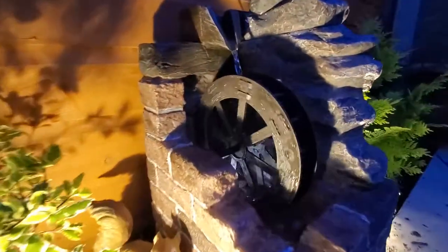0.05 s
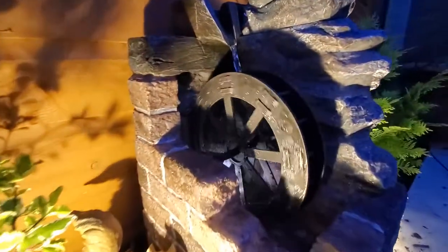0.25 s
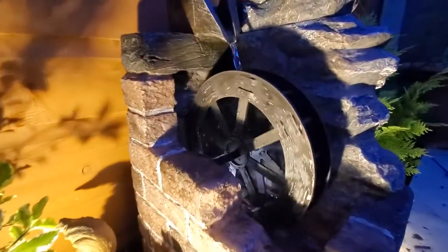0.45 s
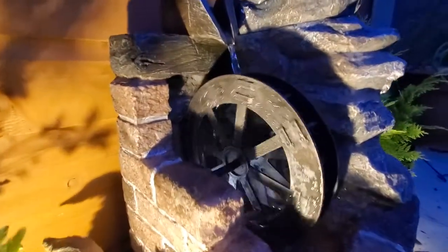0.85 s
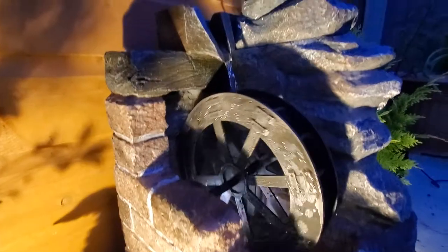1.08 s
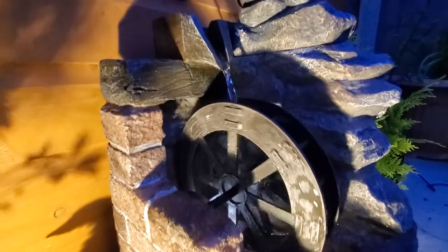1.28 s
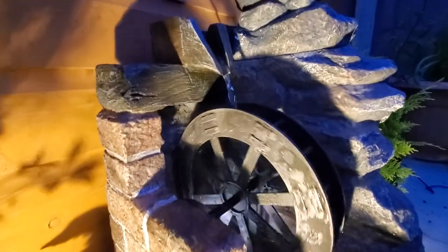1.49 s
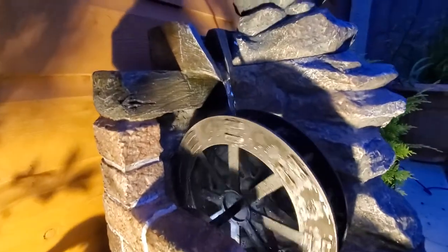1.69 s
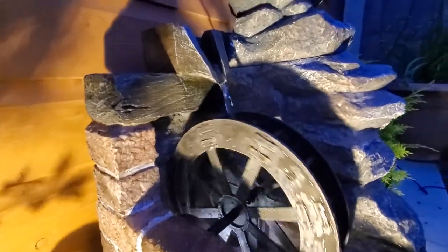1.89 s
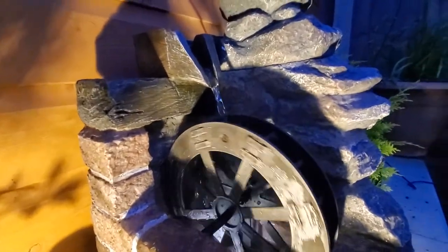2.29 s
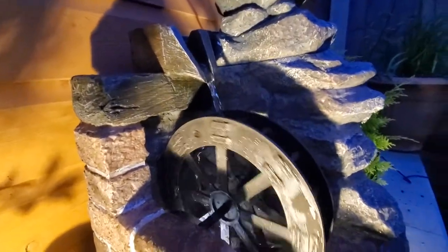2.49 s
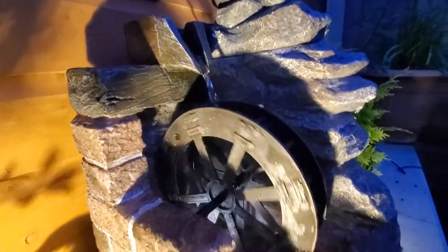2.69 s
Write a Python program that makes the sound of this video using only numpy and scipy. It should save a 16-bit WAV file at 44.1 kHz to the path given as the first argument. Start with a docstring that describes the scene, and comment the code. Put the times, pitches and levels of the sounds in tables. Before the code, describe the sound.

Water drips and splashes steadily in a small stone fountain nearby. Round plops, quick slaps on the wheel and tiny bubble pings mingle throughout, above a faint pump hum and a soft outdoor rumble.

```python
"""Water plops, patters and fizzes as a thin stream falls on the wheel of a small garden fountain.
Big drops trap air in the basin, and each bubble rings with a rising pitch. Other drops slap the wet
paddles, while small bubbles ping through a fine spray. The stone surround answers briefly;
a low rumble and a faint pump hum lie underneath."""
import sys
import numpy as np
from scipy import signal
from scipy.fft import rfft, irfft
from scipy.io import wavfile
from scipy.ndimage import uniform_filter1d

SR = 44100
rng = np.random.default_rng(int(sys.argv[2]) if len(sys.argv) > 2 else 0)


def wrap_up_sound(samples):
    """Save the sound to the file named by the first command line argument, as 16-bit audio."""
    columns = np.atleast_2d(samples).T
    # keep every value between -1 and 1, then stretch to whole-number steps
    tamed = np.clip(columns, -1, 1)
    steps = np.round(tamed * 32767).astype(np.int16)
    wavfile.write(sys.argv[1], SR, steps)


N = 125685

# how alike left and right are in any noise: frequency_hz, likeness_0_to_1
STEREO_LIKENESS = [(100, 0.99), (450, 0.84), (900, 0.13), (1800, 0.11), (4000, 0), (15000, 0.07)]
# tones of the pump: pitch_hz, level_db
PUMP_TONES = [(59, -59), (224, -65.5)]
# EQ curves: frequency_hz, gain_db
RUMBLE_EQ = [(20, -26), (38, -21), (50, -1.5), (59, 1), (72, -0.5), (95, -5), (125, -6.5), (180, -13.5),
             (300, -17.5), (500, -14.5), (800, -15), (1300, -23.5), (1900, -25), (3000, -35), (6500, -43.5),
             (8500, -50), (15500, -49.5)]  # outdoor rumble with a soft wash of water
STONE_EQ = [(150, 23.5), (500, -4.5), (1000, 4.5), (2000, 5.5), (6000, -10), (15000, -4)]  # reflections off the stonework
CRACK_EQ = [(500, -18), (2000, -8), (6000, -6.5), (9000, -7.5), (15000, -5.5)]  # one droplet bursting
SPRAY_EQ = [(300, -3), (800, 18), (1800, 4), (3500, -0.5), (6600, 3), (8200, -6.5), (11000, -2),
            (13500, -6), (15500, -0.5), (17000, -20)]  # all the spray's ticks together
SPLASH_EQ = [(200, -9), (500, -8.5), (900, 13.5), (1300, -3.5), (1600, -3), (1860, 7.5), (2200, -6),
             (3500, 0.5), (6500, -10), (8500, -13.5), (15000, -15.5)]  # water breaking on a paddle
SPLAT_EQ = [(300, -9.5), (800, 7), (1300, 0), (2200, -20), (5000, -43), (15000, -46)]  # a big drop hitting the basin
# fader ride of the fine spray: time_s, level_db
SPRAY_RIDE = [(0, -59), (.15, -57.5), (.33, -52), (.47, -60.5), (.6, -52.5), (.75, -60.5), (.95, -53),
              (1.09, -56), (1.2, -68.5), (1.4, -59), (1.48, -55.5), (1.68, -53.5), (1.79, -65.5),
              (1.88, -54), (2.24, -57.5), (2.35, -61.5), (2.47, -54), (2.85, -56.5)]
# small bubbles that stand out of the spray: start_s, pitch_hz, level_db, pan_db
BUBBLE_PINGS = [(0.022, 4400, -43, -5.5), (0.087, 3610, -35, 0), (0.141, 6820, -35, 1),
                (.228, 6200, -35.5, 0), (0.2382, 4690, -36, -1), (0.268, 6450, -25.5, 1.5),
                (.2905, 4540, -46, -1), (0.3114, 1720, -40, -4), (.331, 4200, -56, 1),
                (0.401, 5660, -35.5, 5), (0.5952, 1650, -39.5, -2), (.7635, 2045, -37, -3),
                (0.8338, 3420, -34, 0), (0.908, 7300, -39.5, 10), (0.9888, 6320, -34, 6),
                (1.0747, 4840, -35.5, -12), (1.159, 6100, -42.5, 9), (1.2297, 2170, -37, -2),
                (1.4937, 3160, -35.5, 4), (1.595, 3110, -34, 1), (1.654, 9550, -42, 8),
                (1.6588, 3530, -33.5, -5), (1.8484, 5000, -33.5, -2), (1.8636, 5580, -33, 4),
                (1.910, 9850, -39, 3), (1.9222, 5340, -37, 4), (2.0291, 3030, -31.5, 6),
                (2.2022, 4810, -31.5, -7.5), (2.2165, 8740, -32, 7), (2.5053, 4650, -36, 6),
                (2.5976, 9300, -41, 9.5), (2.6001, 3500, -29, 1), (2.673, 7665, -43, 9),
                (2.7205, 6700, -36, 1), (2.788, 4931, -37, -1.5)]
# drops on the wet paddles: start_s, pitch_hz, ring_db, splash_db, treble_db, pan_db
PADDLE_SLAPS = [(0.2026, 1382, -26.5, -41.5, 11, 0), (.233, 1670, -32.5, -51, -7, -9),
                (0.2662, 1335, -46, -47, -5, -7), (0.2788, 1343, -31, -35.5, -15, -1),
                (.3215, 2785, -31, -35.5, 5, -0.5), (0.5196, 2234, -26, -40.5, 1, -2.5),
                (0.5336, 1690, -37, -47, 6, -4), (0.5751, 2350, -30, -37.5, 0, -2),
                (0.807, 2900, -31, -38, -1, 2), (0.9648, 2310, -34, -41.5, -23, -2),
                (1.0425, 1870, -35.5, -51, 4, 2), (1.0795, 1850, -32, -35, -2.5, 0),
                (1.2713, 2971, -33.5, -42.5, 7, 3.5), (1.2966, 1367, -35.5, -40.5, -1, -0.5),
                (1.3692, 1750, -35, -52, 1, -1), (1.4696, 4060, -32.5, -42, 16, 0),
                (1.638, 2510, -30.5, -39, -13, -2), (1.6744, 4180, -29.5, -36.5, 7.5, -1.5),
                (1.739, 2500, -53, -41.5, 14, 2), (1.8418, 1810, -28.5, -38, -0.5, -5),
                (1.8671, 3380, -33, -41.5, 14, 0), (1.9460, 2727, -29.5, -44.5, -6, 5),
                (2.0434, 1853, -30.5, -40, -1, 0), (2.055, 1710, -43, -44.5, 11, 2),
                (2.063, 1940, -45, -42, 19, 1), (2.0875, 1910, -30.5, -38.5, -35, -1),
                (2.1102, 1800, -29.5, -40, 5, 0), (2.2008, 1780, -35.5, -44.5, 12, -3),
                (2.218, 6700, -40, -31.5, 41, 1.5), (2.2242, 1674, -33, -37.5, -4, -1),
                (2.2747, 5320, -34.5, -41.5, 9, 1), (2.4383, 2180, -26.5, -34.5, -3, -2),
                (2.4508, 1694, -22.5, -39.5, 8.5, -5), (2.4854, 1950, -34, -59, -24, -5),
                (2.5394, 2750, -30.5, -36.5, 5, -0.5)]
# drops in the basin: start_s, pitch_hz, level_db, pitch_rise_share, swell_s, decay_s, pan_db
BASIN_PLOPS = [(0.2021, 897, -24, 0.044, 0.00062, 0.0022, -5),
               (0.2343, 425, -17.5, 0.79, 0.0013, 0.0052, -1.5),
               (.2671, 766, -16, 0.022, 0.00064, 0.0025, -2.5), (.2785, 672, -32, 0.07, 0.00043, 0.014, -1),
               (0.4432, 467, -16.5, 0.97, 0.0015, 0.0033, -1.7),
               (.6448, 473, -16, 0.3, 0.0017, 0.0021, -1.7), (0.675, 211, -45.5, 0.084, 0.0037, 0.01, 1.5),
               (.9427, 734, -16.5, 0.033, 0.0005, 0.0038, -3.5),
               (.9530, 700, -31.5, 0.066, 0.0022, 0.0062, -3),
               (.9655, 794, -28.5, 0.11, 0.00043, 0.00091, -8),
               (0.9886, 850, -37, 0.13, 0.00065, 0.0019, -6),
               (1.015, 424, -19.5, 1.31, 0.002, 0.0022, -1.7),
               (1.0786, 865, -24.5, 0.089, 0.00067, 0.0014, -5),
               (1.2945, 816, -19.5, 0.14, 0.0015, 0.0046, -5),
               (1.3542, 466, -30, 0.2, 0.0002, 0.0017, -1.5),
               (1.7654, 393, -24.5, 1.33, 0.0032, 0.0015, -2), (1.793, 490, -26, .1, 0.00071, 0.00064, -3),
               (1.795, 200, -38, 0.13, 0.0025, 0.011, -0.5), (1.973, 456, -41, .15, 0.00068, .005, 0),
               (1.995, 460, -41, 0.13, 0.00091, 0.0037, -2), (2.0421, 940, -22, 0.03, 0.0022, 0.001, -6.5),
               (2.0853, 850, -34.5, 0.11, .001, 0.0021, -2),
               (2.2257, 820, -34.5, 0.11, 0.00031, 0.0047, -6),
               (2.378, 205.5, -43.5, 0.076, .003, 0.017, -0.5),
               (2.4505, 910, -30.5, 0.063, .001, 0.0015, -7), (2.5055, 840, -36.5, 0.11, .001, 0.0024, -4),
               (2.5622, 346, -23.5, 1.21, 0.0023, .0036, -1), (2.5845, 760, -34, 0.11, .001, 0.0013, -4),
               (2.766, 614, -37.5, 0.079, 0.00065, 0.0015, -3)]

PING_SWELL_S, PING_DECAY_S, PING_RISE = 0.00072, 0.0023, 0.038
RING_SWELL_S, RING_DECAY_CYCLES, RING_RISE = 0.00035, 7.2, 0.042
SPLASH_SWELL_S, SPLASH_DECAY_S, WASH_DECAY_S, WASH_DB = 0.0016, 0.0023, 0.026, -13


def undb(db):
    """Decibels to gain."""
    return 10 ** (np.asarray(db) / 20)


def unit(x):
    """Scale to rms 1."""
    return x / np.sqrt(np.mean(x ** 2) + 1e-20)


def curve(points, size):
    """Read (Hz, value) points at the bins of a spectrum."""
    hz, value = np.array(points, float).T
    return np.interp(np.log(np.fft.rfftfreq(size, 1 / SR) + 1), np.log(hz), value)


def noise(eq, size):
    """Coloured stereo noise, centred in the bass and wide on top."""
    likeness = curve(STEREO_LIKENESS, size)
    mid, side = rfft(rng.standard_normal((2, size))) * undb(curve(eq, size))
    mid, side = mid * np.sqrt(1 + likeness), side * np.sqrt(1 - likeness)
    return unit(irfft(np.array([mid + side, mid - side]), size))


def drift(rate_hz):
    """Slow random wander with a spread near 1."""
    step = int(SR / rate_hz)
    return uniform_filter1d(np.repeat(rng.standard_normal(N // step + 2), step), step)[:N]


def place(out, start_s, sound, pan_db):
    """Drop a short sound into the mix; positive pan leans left."""
    i = int(np.clip(start_s * SR, 0, N - 1))
    panned = sound * undb(np.array([[pan_db], [-pan_db]]) / 2)
    out[:, i:i + sound.shape[-1]] += panned[:, :N - i]


def seconds(size=4096):
    """Time since a sound began."""
    return np.arange(size) / SR


def envelope(t, swell_s, decay_s):
    """Rounded attack and exponential decay, peak 1."""
    shape = (1 - np.exp(-(t / swell_s) ** 2)) * np.exp(-t / decay_s)
    return shape / shape.max()


def rumble(level_db=-50.5, waver_db=0.83):
    """The bed: outdoor rumble and a soft wash of water, gently wavering."""
    return noise(RUMBLE_EQ, N) * undb(level_db + waver_db * drift(9.71))


def pump_hum(waver_db=3.5, wobble_rad=1.35):
    """The pump hums on two low tones that wander in level and phase."""
    hum = np.zeros(N)
    for hz, db in PUMP_TONES:
        peak = np.sqrt(2) * undb(db + waver_db * drift(7.08))
        hum += peak * np.sin(2 * np.pi * hz * seconds(N) + wobble_rad * drift(6.28))
    return hum


def stone_echo(predelay_s=0.0026):
    """Impulse response: tight reflections off the close stonework, a longer tail from the yard."""
    t = np.maximum(seconds(12000) - predelay_s, 0)

    def tail(db, decay_s):
        reflections = noise(STONE_EQ, len(t)) * envelope(t, 0.00033, decay_s)
        return undb(db) * unit(reflections) / np.sqrt(len(t))
    return tail(db=-12.5, decay_s=0.0076) + tail(db=-16.5, decay_s=0.021)


def bubble(hz, rise, swell_s, decay_s, lag_s=None, glide_s=0.0054):
    """Trapped air rings and climbs by the share `rise` of its pitch as it nears the surface."""
    if lag_s is None:  # somewhere around the wheel: the right ear usually hears it later
        lag_s = rng.normal(0.00011, 0.00007)
    t = np.maximum(seconds() - np.array([[0], [lag_s]]), 0)
    cycles = hz * (t + rise * (t - glide_s * (1 - np.exp(-t / glide_s))))
    return envelope(t, swell_s, decay_s) * np.sin(2 * np.pi * cycles)


def tick(hz, swell_s, decay_s, width_oct=0.088, skirt_db=-16, size=1024):
    """A droplet bursts: a brief crack coloured by its own resonance."""
    octaves = np.log2((np.fft.rfftfreq(size, 1 / SR) + 1) / hz)
    resonance = 1 / (1 + (octaves / width_oct) ** 2) + undb(skirt_db)
    crack = irfft(rfft(noise(CRACK_EQ, size)) * resonance, size)
    return envelope(seconds(size), swell_s, decay_s) * unit(crack)


def scatter(per_s, low_hz, high_hz, spread_db=6, width_db=5.5):
    """A loose, steady sprinkle of droplets: start_s, pitch_hz, gain, pan_db."""
    count = int(per_s * N / SR)
    jitter, strength, side, height = rng.random((count, 4)).T
    start_s = (np.arange(count) + 4 * jitter - 2) / per_s % (N / SR)
    hz = low_hz * (high_hz / low_hz) ** height
    gain = undb(spread_db * np.minimum(-np.log(1 - strength), np.e))  # many soft, a few loud
    return zip(start_s, hz, gain, width_db * (2 * side - 1))


def spray(fizz_db=-3.5, decay_cycles=6.1):
    """Fine droplets tick on wood and stone and tiny bubbles fizz, swelling and ebbing together."""
    ticks, fizz = np.zeros((2, N)), np.zeros((2, N))
    for start_s, hz, gain, pan_db in scatter(per_s=150, low_hz=2040, high_hz=16200):
        place(ticks, start_s, gain * tick(hz, swell_s=0.00033, decay_s=0.0035), pan_db)
    for start_s, hz, gain, pan_db in scatter(per_s=300, low_hz=757, high_hz=3440):
        place(fizz, start_s, gain * bubble(hz, PING_RISE, PING_SWELL_S, decay_cycles / hz), pan_db)
    ticks = irfft(rfft(ticks) * undb(curve(SPRAY_EQ, N)), N)
    flow = undb(np.interp(seconds(N), *np.array(SPRAY_RIDE).T))
    return flow * (unit(ticks) + undb(fizz_db) * unit(fizz))


def pings(crack_db=-12.5, ring_db=-2):
    """The sparkle: small bubbles ring, each set off by a tiny crack."""
    out = np.zeros((2, N))
    for start_s, hz, db, pan_db in BUBBLE_PINGS:
        crack = tick(hz, PING_SWELL_S, PING_DECAY_S)
        ring = bubble(hz, PING_RISE, PING_SWELL_S, PING_DECAY_S)
        place(out, start_s, undb(db + crack_db) * crack, pan_db)
        place(out, start_s, undb(db + ring_db) * ring, pan_db)
    return out


def gurgle(count=7, span_s=0.02, low_hz=1290, high_hz=4460, decay_cycles=8):
    """A quick, fading cluster of tiny bubbles left by a splash."""
    out = 0
    for lateness, height in rng.random((count, 2)):
        hz = low_hz * (high_hz / low_hz) ** height
        ring = bubble(hz, PING_RISE, RING_SWELL_S, decay_cycles / hz)
        out = out + np.exp(-2 * lateness) * np.roll(ring, int(lateness * span_s * SR), axis=1)
    return out


def paddle_slaps(gurgle_db=-2, lead_s=0.0055, lead_db=-11.5):
    """Drops burst on the paddles: a sharp splash, a softer wash, a short watery ring and a gurgle."""
    out, t = np.zeros((2, N)), seconds()
    burst = envelope(t, SPLASH_SWELL_S, SPLASH_DECAY_S)
    wash = undb(WASH_DB) * envelope(t, SPLASH_SWELL_S, WASH_DECAY_S)
    for start_s, hz, ring_db, splash_db, treble_db, pan_db in PADDLE_SLAPS:
        # each burst has its own high shelf, ramping in over the octave above 3800 Hz
        burst_eq = [(f, db + treble_db * np.clip(np.log2(f / 3800), 0, 1)) for f, db in SPLASH_EQ]
        ring = bubble(hz, RING_RISE, RING_SWELL_S, RING_DECAY_CYCLES / hz)
        splash = burst * noise(burst_eq, len(t)) + wash * noise(SPLASH_EQ, len(t))
        splash += undb(gurgle_db) * gurgle()
        place(out, start_s, undb(ring_db) * ring + undb(splash_db) * splash, pan_db)
        # outriders of the drop land just ahead of it
        place(out, start_s - lead_s, undb(splash_db + lead_db) * gurgle(), pan_db)
    return out


def basin_plops(splat_db=-20.5, splat_decay_s=0.0044):
    """Big drops splat on the basin and trap air that rings with a round, rising plop."""
    out, t = np.zeros((2, N)), seconds()
    for start_s, hz, db, rise, swell_s, decay_s, pan_db in BASIN_PLOPS:
        # a bubble radiates little far below its starting pitch
        low_cut = signal.butter(2, 0.45 * hz, "high", fs=SR, output="sos")
        ring = signal.sosfilt(low_cut, bubble(hz, rise, swell_s, decay_s, lag_s=0.00004))
        splat = undb(splat_db) * envelope(t, swell_s, splat_decay_s) * noise(SPLAT_EQ, len(t))
        place(out, start_s, undb(db) * (ring + splat), pan_db)
    return out


def scene():
    """The water and its echo off the stone, over a dry bed of hum and rumble."""
    bed, echo = pump_hum() + rumble(), stone_echo()
    water = basin_plops() + paddle_slaps() + pings() + spray()
    return bed + water + signal.fftconvolve(water, echo, axes=1)[:, :N]


def record(dry):
    """Master EQ: roll off the deepest rumble and cut the very top steeply."""
    low_cut = signal.butter(2, 26, "high", fs=SR, output="sos")
    high_cut = signal.ellip(12, 0.2, 70, 15900, fs=SR, output="sos")
    return signal.sosfilt(high_cut, signal.sosfilt(low_cut, dry))


dry = scene()
out = record(dry)
wrap_up_sound(out)
```